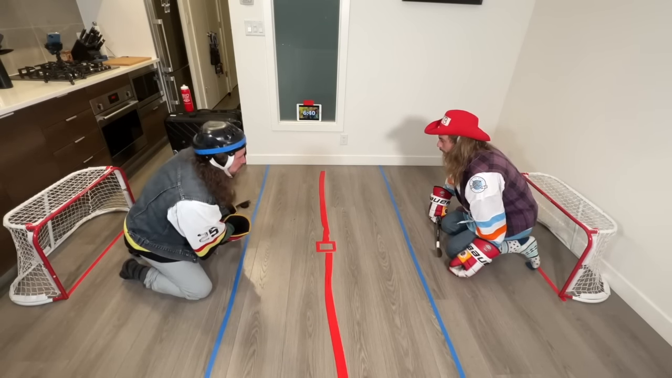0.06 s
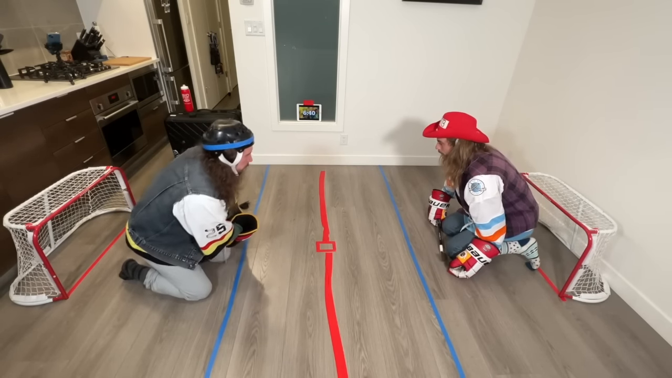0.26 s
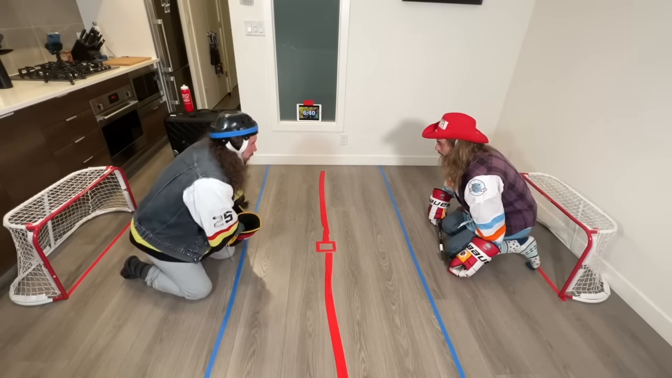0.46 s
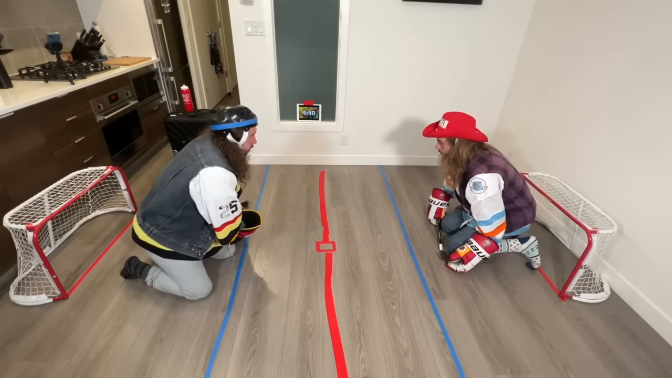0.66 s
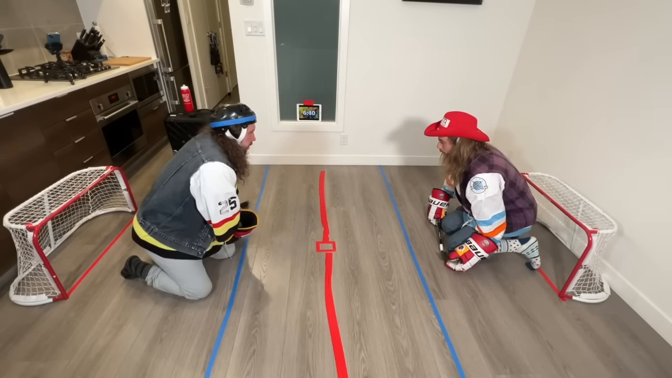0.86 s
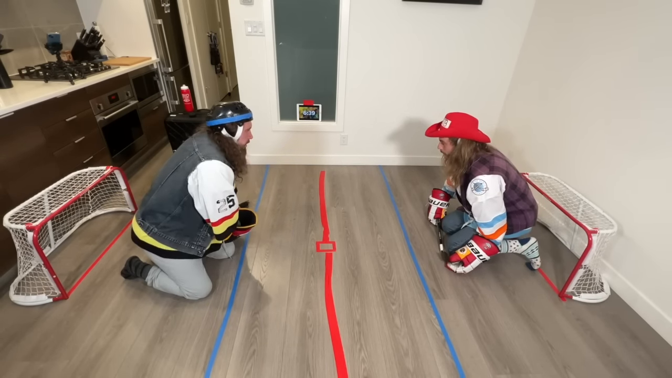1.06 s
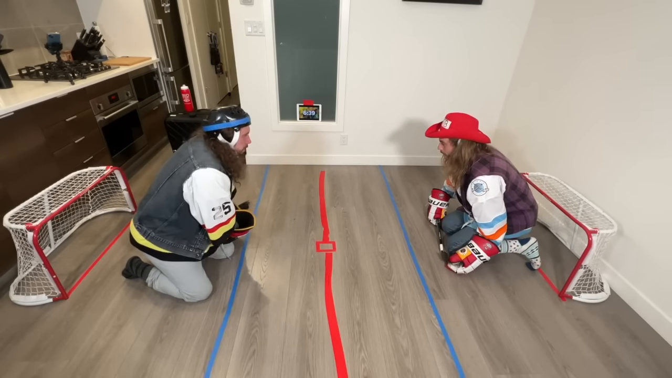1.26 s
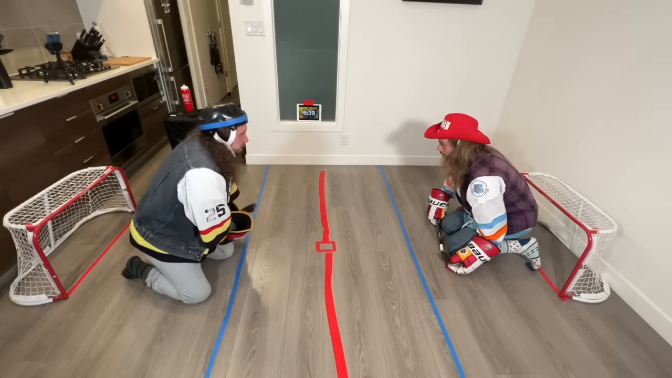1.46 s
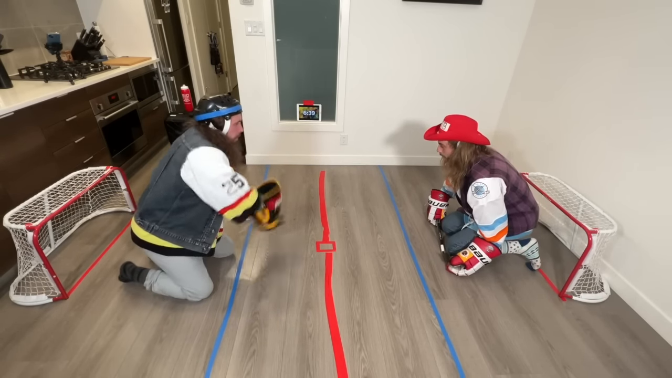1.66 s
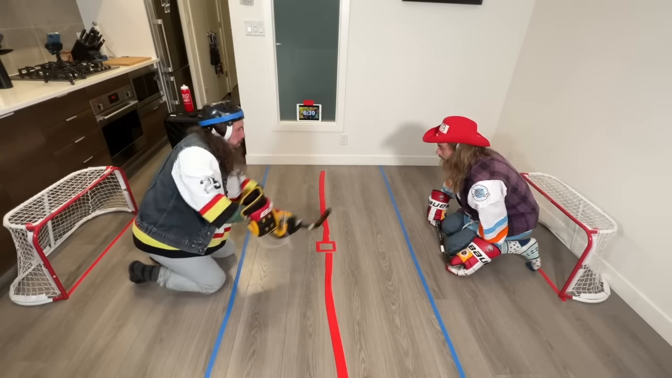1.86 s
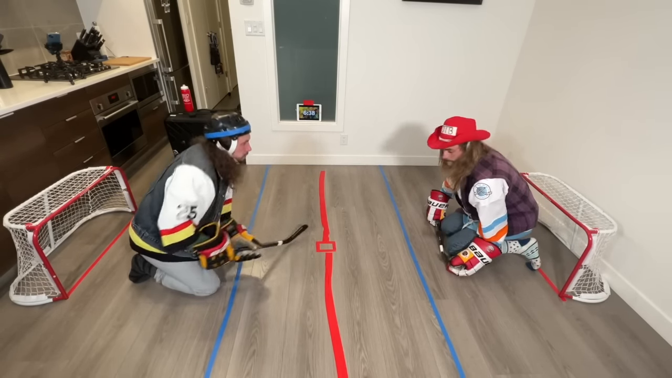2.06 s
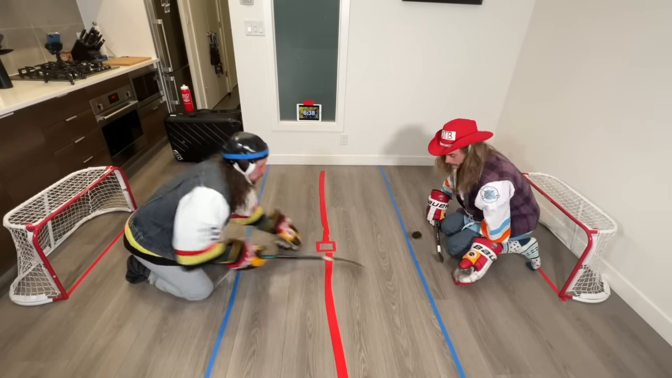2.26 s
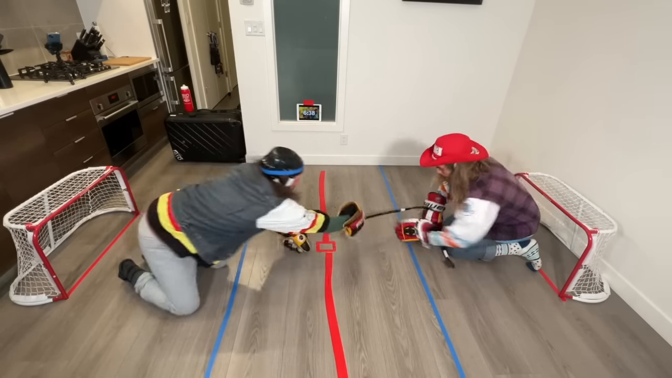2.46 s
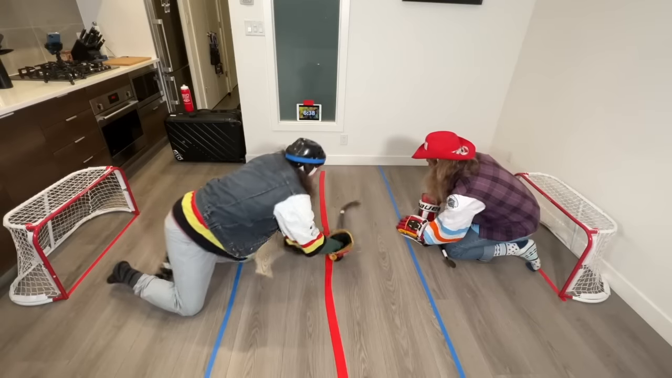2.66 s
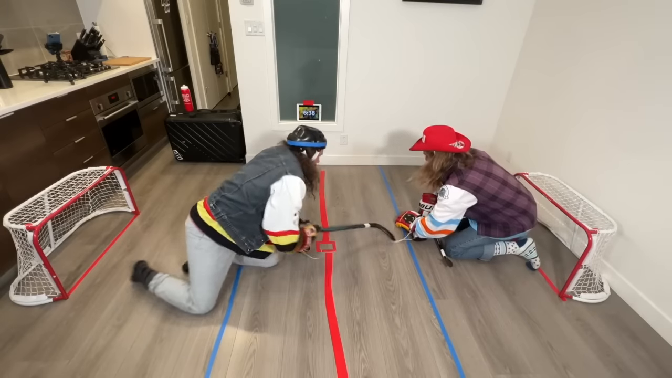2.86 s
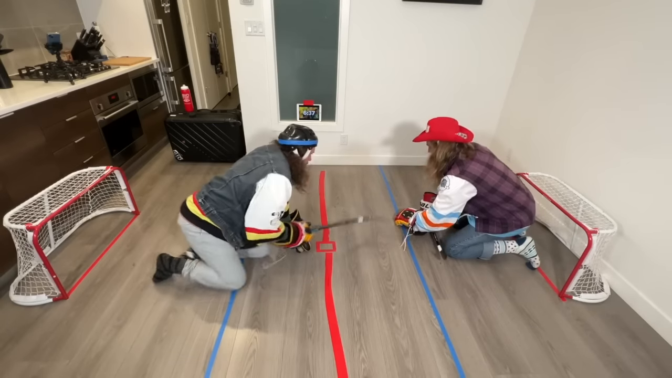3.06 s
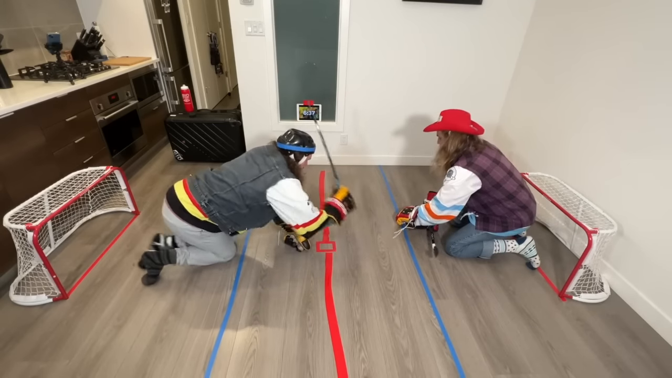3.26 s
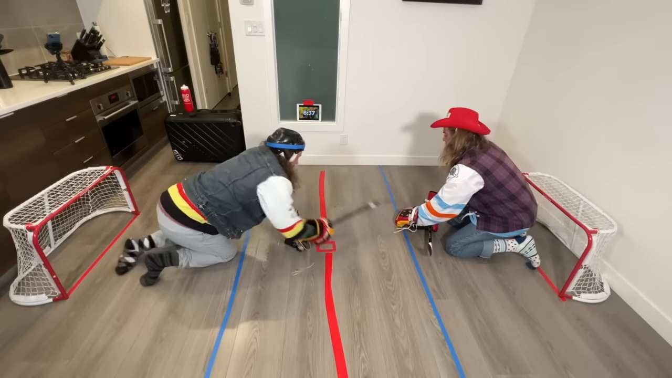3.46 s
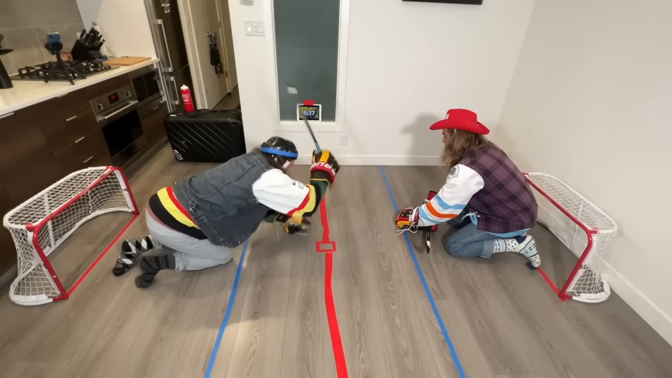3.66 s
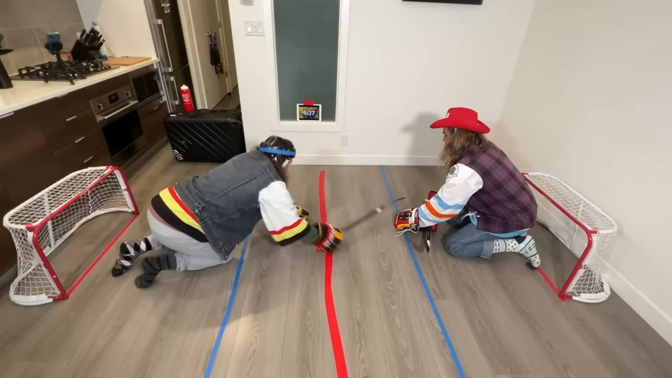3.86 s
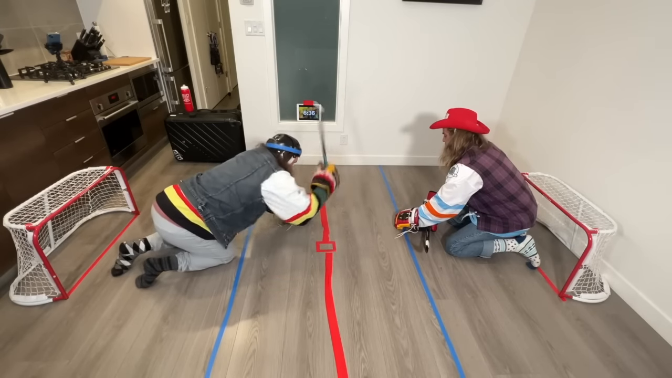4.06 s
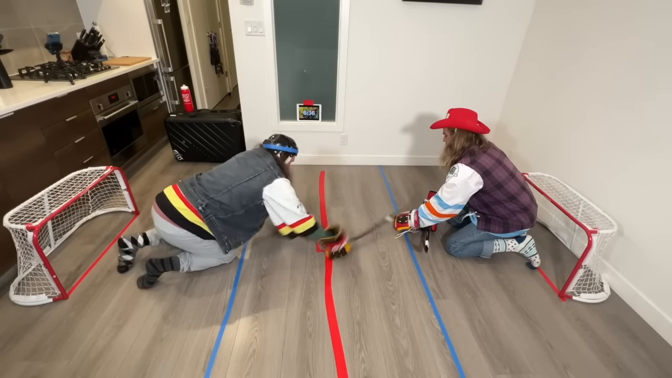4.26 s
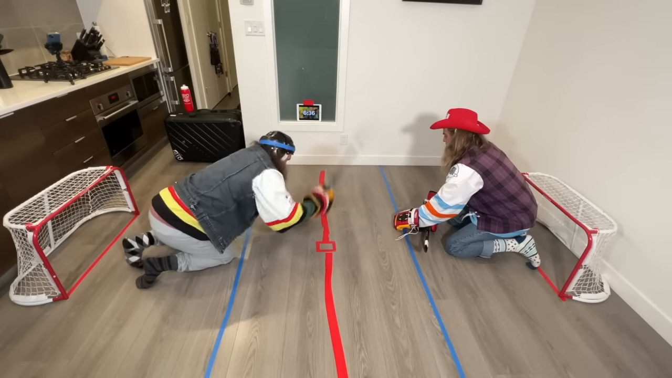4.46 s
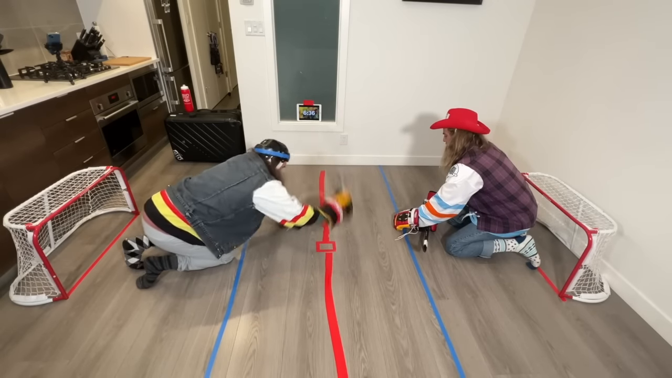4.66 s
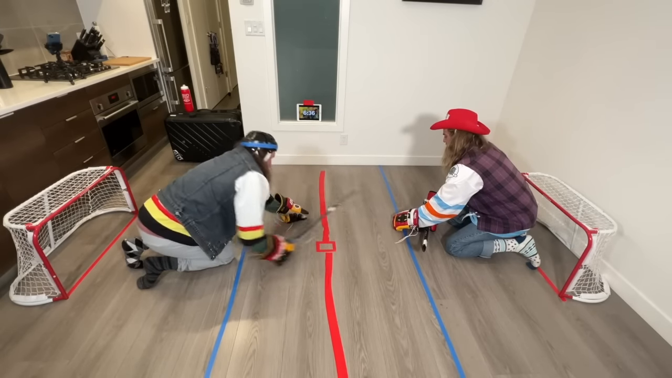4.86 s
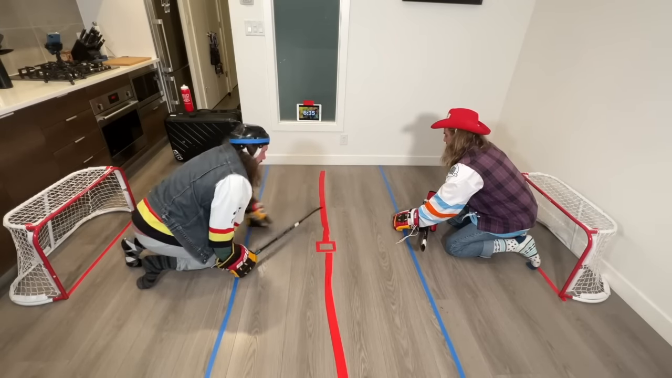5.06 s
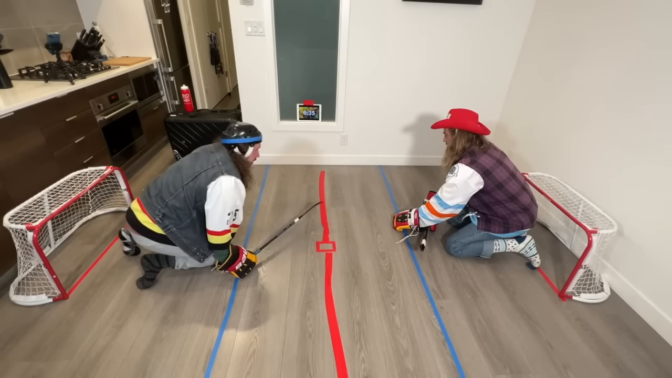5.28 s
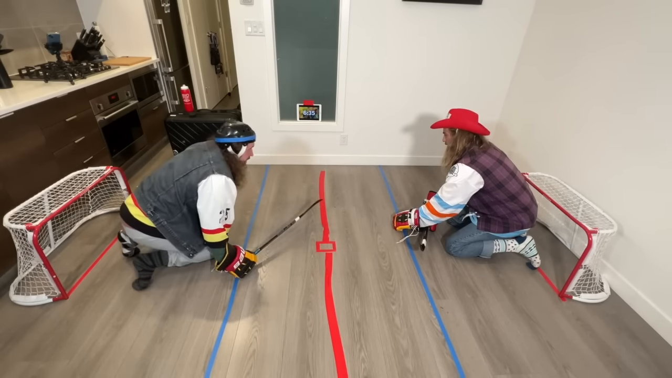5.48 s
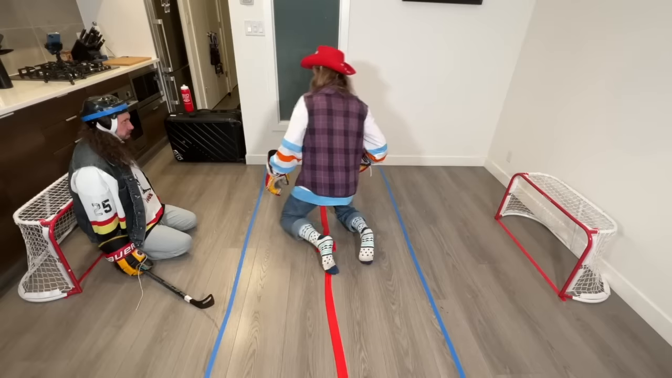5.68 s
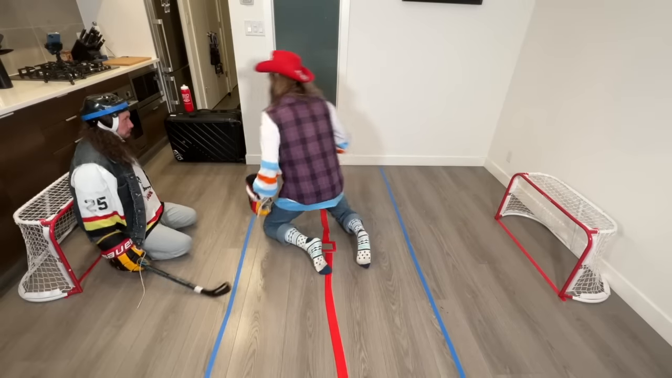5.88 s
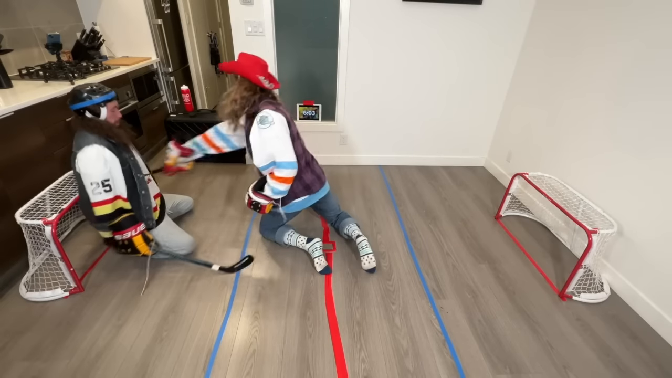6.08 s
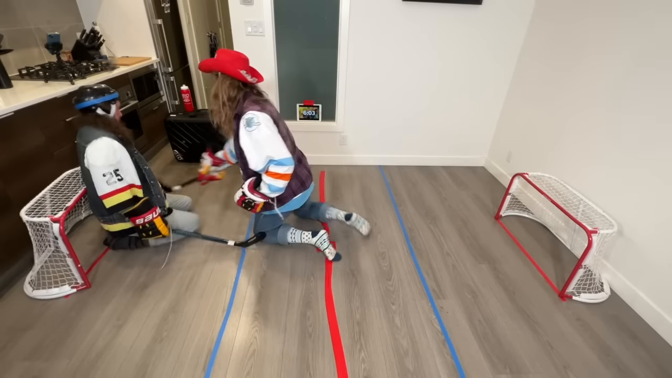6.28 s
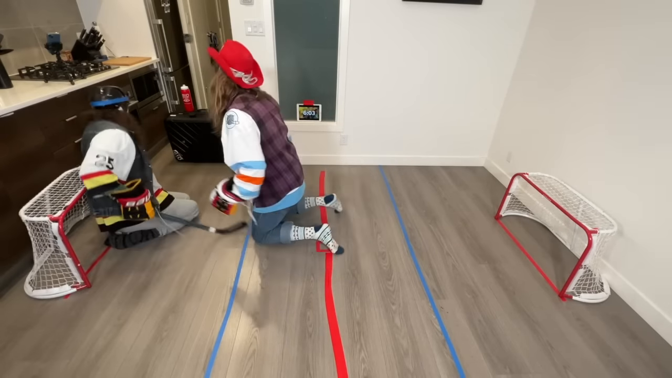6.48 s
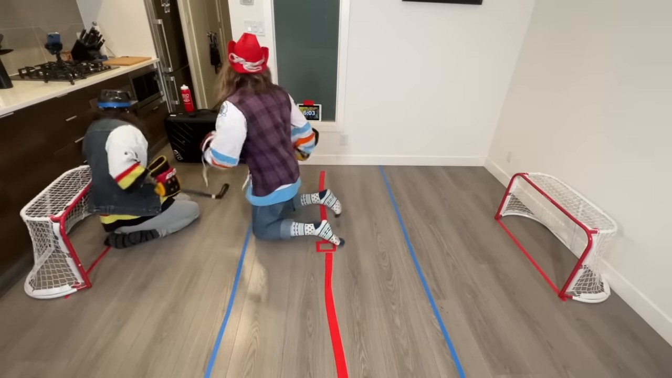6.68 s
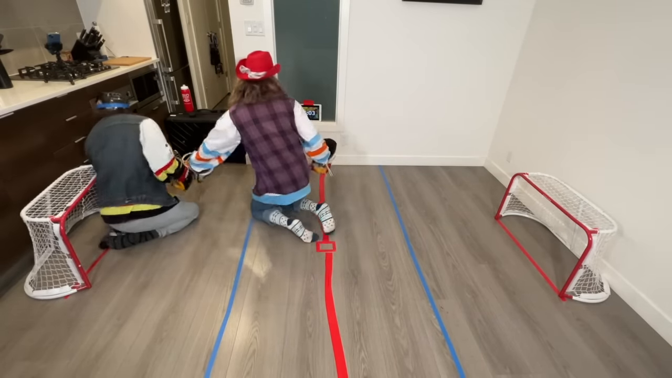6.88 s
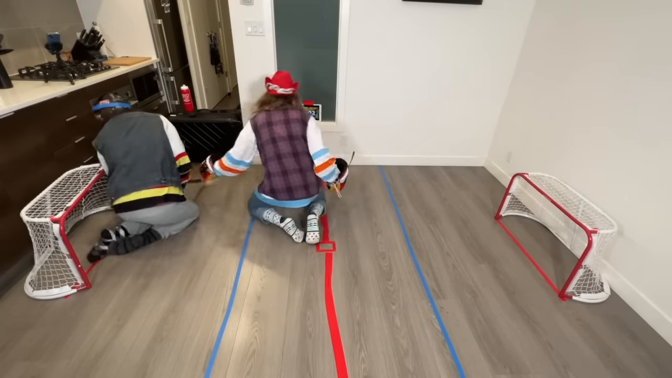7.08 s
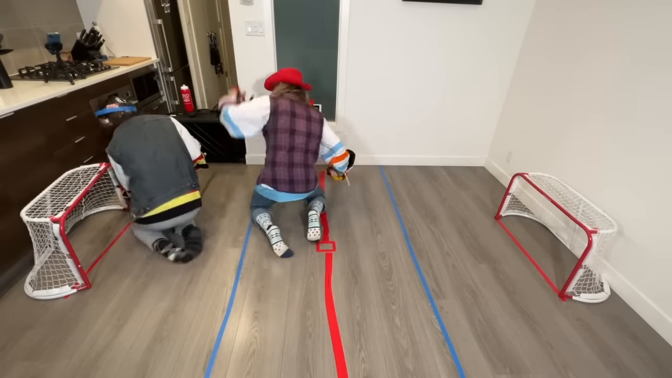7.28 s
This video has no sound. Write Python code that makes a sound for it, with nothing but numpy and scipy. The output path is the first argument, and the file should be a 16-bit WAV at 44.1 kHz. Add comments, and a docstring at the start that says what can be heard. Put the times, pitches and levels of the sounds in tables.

```python
"""Knocks and slides on a kitchen floor

Two kneeling players knock short plastic sticks and a ball on a hard floor; one slaps the boards in a steady beat.
Blows are noise cracks, coloured by resonances, with early reflections and a reverberant tail of the bare room.
Sliding cloth, blades and knees are fluctuating noise; a juddering creak, a thin squeak and droning boards
are narrow bands of noise, over a quiet room tone. An overall tone colour, unequal left and right, and a limiter follow.
"""
import sys
import numpy as np
from scipy import signal
from scipy.fft import rfft, irfft, next_fast_len
from scipy.io import wavfile
from scipy.ndimage import uniform_filter1d, minimum_filter1d, map_coordinates

SR = 44100
rng = np.random.default_rng(int(sys.argv[2]) if len(sys.argv) > 2 else 0)


def undo_db(level):
    """Turn decibels back into plain size, where 20 dB means ten times bigger."""
    steps = np.asarray(level, float) / 20
    return 10 ** steps


def put_to_file(sound):
    """Save the sound as 16-bit audio at rate SR, in the file named by the first command-line argument."""
    columns = np.atleast_2d(sound).T  # one column per channel
    safe = np.clip(columns, -1, 1)
    whole_steps = np.round(safe * 32767)
    wavfile.write(sys.argv[1], SR, whole_steps.astype(np.int16))


N = 323253  # length in samples

# standing waves of the room: (frequency [Hz], width [Hz], peak gain [dB])
ROOM_MODES = [(62, 15, 15), (130, 27, 9), (169.7, 48, 5), (278.4, 16, 4), (560, 31, 0), (702, 40, 0.5)]


def knocks():
    """Impact on hollow bodies: one firm push more than a crackle, then decaying tones of the body and the floor."""
    # shaft, knee and glove; levels before the trims below, the last two against the knock:
    # (time [s], knock level [dB], pitch [Hz], floor thud level [dB], clack level [dB])
    knock_rows = [(0.23, -24.5, 570.8, -51, -14.5), (1.756, -14, 451.5, -15.5, -8),
                  (1.959, -5.5, 473, -30.5, -8.5), (1.971, -10.5, 464, -29, -8.5),
                  (2.155, -30, 319, -11, -2.66), (2.286, -15.5, 459, -52, -18), (2.433, -19, 559, -18, -12),
                  (2.474, -4, 476, -32, -9), (2.489, 1.5, 562, -30, -28), (2.5135, -4.5, 532, -40.5, -6),
                  (2.544, -15, 547, -33.5, -9), (2.602, -11, 520, -30, -8), (2.761, -21.5, 620, -19, 7),
                  (3.271, -44, 636, -21, -9), (5.01, -10.5, 525, -33, -1.5), (5.957, -14.5, 557, -13, -0.3),
                  (6.153, -37, 524, -8.5, 9.5), (6.262, -24.5, 646, 7, 0.1), (6.364, -13.5, 527, -15, -11),
                  (6.611, -11, 420, -28, -3.5), (6.649, -21, 393.5, -42, -29.5),
                  (6.805, -23.5, 437, -3, -13), (6.879, -25, 455, 0.26, -13), (7.039, -5, 386, -27, -11)]
    total = np.zeros((2, N))
    for s, db, hz, thud, clack in knock_rows:
        middle = -1.5 + 0.143 * thud  # heavier knocks carry more middle
        parts_db = db - 15 + np.array([thud - 1.5, 0, middle, clack + 3, clack - 22])
        total += blow(s, parts_db, [(hz, 90, 9)], rise=0.00085, push_db=23)
        total += hollow(s, db - 10.5, hz, t60=0.1174)
        total += hollow(s + 0.004, db + thud - 11, hz=128, t60=0.12)  # the floor
    return total


def clacks():
    """Impact of hard plastic on plastic and on the ball: a broadband crack coloured by the modes of the shaft."""
    # levels before the trims below, the last two against the clack:
    # (time [s], clack level [dB], body level [dB], snap level [dB])
    clack_rows = [(2.1899, -31, -7, -23), (2.306, -5, -13, -14), (2.5815, -3, -10.5, -22.5),
                  (2.6896, -19, -13, -16.5), (2.849, -27.5, -8, -14.5), (5.0114, -9.5, -3.5, -29),
                  (5.5793, -52, -10, -36), (6.132, -31, 8.5, -22), (7.0375, -5.5, -4.5, -25.5),
                  (7.229, -23, -7, -24)]
    # the struck shaft rings: (frequency [Hz], width [Hz], peak gain [dB])
    shaft_modes = [(1300, 110, 3.5), (2606, 81, 2.5), (3426, 480, 5.5), (4590, 550, 2), (4920, 200, 4),
                   (6900, 760, 3)]
    start_s, gap_s, body_db, snap_db = 1.6428, 0.0087, -27, -19.5  # a stick pulled free chatters
    rattle = [(start_s + k * gap_s, db, body_db, snap_db) for k, db in enumerate([-11.5, -4, -5, -4.5, -8.5])]
    total = np.zeros((2, N))
    for s, db, body, snap in rattle + clack_rows:
        middle = -2 + 0.64 * body  # the middle follows the body in part
        parts_db = db - 9 + np.array([body - 26.5, body + 3, middle, 0, snap + 2])
        total += blow(s, parts_db, shaft_modes, rise=0.0025, push_db=20.5)
    return total


def slaps():
    """Flat impact of a blade, often heel first: a crack coloured by the blade's modes, and two decaying tones."""
    # levels before the trims below: (time [s], clack level [dB], body level against the clack [dB])
    slap_rows = [(3.3646, -11, -2.5), (3.8233, -19.5, 2), (3.8306, -12, -7), (3.8479, -14.5, -7),
                 (4.2638, -11.5, -6.5), (4.2768, -12, -5.5), (4.7244, -10.5, 1.5), (4.7312, -14, -0.2)]
    # the slapped blade rings: (frequency [Hz], width [Hz], peak gain [dB])
    blade_modes = [(345, 77, 7.5), (1320, 120, -1), (1575, 320, 3), (6170, 1300, 3)]
    total = np.zeros((2, N))
    for s, db, body in slap_rows:
        parts_db = db - 6.5 + np.array([-8, body + 3, -0.03, 0, -11.5])
        total += blow(s, parts_db, blade_modes, rise=0.00086, push_db=19.5)
        total += hollow(s, db + body - 4.5, hz=493.9, t60=0.082)
        total += hollow(s, db - 21.5, hz=1556, t60=0.3)
    return total


def blow(s, parts_db, modes, rise, push_db):
    """Room impulse response: a crack comes direct, then as early reflections, then as decaying reverberation."""
    # thud, knock, slap, clack, snap: (frequency [Hz], width over which the power is spread [Hz])
    part_bands = [(130, 150), (460, 550), (1400, 1100), (4300, 5800), (12000, 6500)]
    # gain of the straight path, ahead of the blow's colour: (frequency [Hz], gain [dB])
    direct_gain = [(100, -22), (400, -3), (2000, 0), (7000, 4), (12000, 13)]
    t = np.arange(int(0.9 * SR)) / SR
    onset = 1 - np.exp(-t[:800] / rise)
    crack = undo_db(8.0 - 60 * t[:800] / 0.0074) * onset * rng.standard_normal(800)
    crack[20:28] += undo_db(push_db) / 8  # the contact itself, a fifth of a millisecond

    walls = np.zeros((2, 2000))  # nine reflections on each side
    delay = rng.integers(120, 2000, (2, 9))
    for side in range(2):
        walls[side, delay[side]] = undo_db(-6.5 - 60 * delay[side] / SR / 0.45) * rng.choice([-1, 1], 9)
    reflections = signal.fftconvolve(crack[None], walls, axes=1)

    answer = diffuse(len(t)) * (1 - np.exp(-t / 0.0008))
    answer[:, :2799] += filtered(reflections, lambda hz: hz / (hz + 300))
    answer = dying(answer) * (t > 0.002)
    direct = filtered(np.pad(crack, (0, 1200)), lambda hz: causal(along(direct_gain, hz)))
    answer[:, :2000] += direct

    part_hz, part_width = np.transpose(part_bands)
    density = np.transpose([part_hz, parts_db - 10 * np.log10(part_width / (SR / 2))])

    def colour(hz):
        deep_bass_cut = 14 * np.log2(1 + 50 / (hz + 1))
        return causal(along(density, hz) + peaks_db(ROOM_MODES + modes, hz) - deep_bass_cut)

    return np.pad(filtered(answer, colour), ((0, 0), (round(s * SR), N)))[:, :N]


def hollow(s, db, hz, t60):
    """Damped free vibration: a struck body's sine decays exponentially, out of step on the two sides."""
    t = np.arange(SR // 4) / SR
    envelope = undo_db(db - 60 * t / t60) * (1 - np.exp(-t / 0.0011))
    ring = envelope * np.sin(2 * np.pi * hz * t + rng.uniform(-1.1, 1, (2, 1)))
    return np.pad(ring, ((0, 0), (round(s * SR), N)))[:, :N]


def strokes():
    """Sliding friction: cloth and blades hiss over the boards as noise that catches and lets go unevenly."""
    # peak level before the flutter, signs of the times ignored:
    # (peak time [s], level [dB], time to gain 20 dB [s], time to lose 20 dB [s])
    stroke_rows = [(0.2, -50.5, 6, 0.42), (1.236, -67, -0.6, 2.95), (1.55, -38, 0.1883, 0.73),
                   (1.655, -27, 0.03, 0.22), (2.206, -56, -0.3, 3), (2.33, -22, 0.0428, 0.22),
                   (2.524, -29, 0.0454, 0.04), (2.648, -25, 0.19, 0.28), (3.2, -48.5, 0.4, 0.93),
                   (5.6, -62, .1, 0.2), (5.83, -46, -0.05, 3), (5.96, -35.5, 0.13, .3),
                   (6.188, -27, 0.11, 0.16), (6.53, -29, 0.1742, 0.1), (6.63, -42.5, -0.06, -0.5),
                   (6.808, -42, -0.2, 10)]
    # relative density: (frequency [Hz], level per Hz [dB])
    hiss_density = [(410, -40.5), (700, -6.5), (1940, -3), (4990, -4.5), (9230, -18.5), (10100, -26.5),
                    (12500, -27.5), (13700, -35.5), (14600, -22), (16000, -42)]
    fidget = undo_db(-78.5)  # the players are never quite still
    flutter = undo_db(1.2 * wobble(60) + 0.88 * wobble(400))
    return (swells(stroke_rows) + fidget) * flutter * rush(hiss_density, patchy_db=2.5)


def scuffs():
    """Friction exciting resonances: pushed knees rub lower than cloth and wake the standing waves."""
    # peak level before the flutter, signs of the times ignored:
    # (peak time [s], level [dB], time to gain 20 dB [s], time to lose 20 dB [s])
    scuff_rows = [(0.0, -48.5, .1, 0.35), (0.248, -41.5, 0.098, 0.21), (1.414, -55, 0.17, 0.17),
                  (1.512, -46, .03, 0.259), (1.645, -41, 0.067, 0.027), (2.206, -36.5, 0.076, 0.19),
                  (2.312, -26.5, .015, 0.13), (2.432, -22, 0.0067, .08), (2.5, -19.5, 0.06, 0.11),
                  (2.59, -23, .012, 0.26), (3.2, -60.5, 0.83, .9), (5.66, -63, 0.12, 0.0205),
                  (5.82, -45.5, 0.056, 2.6), (5.962, -30.5, 0.022, 0.32), (6.19, -36, 0.215, 0.45),
                  (6.44, -29.5, 0.096, 0.2), (6.63, -27, .035, 0.11), (6.808, -34.5, .025, 0.332)]
    # relative density before the standing waves: (frequency [Hz], level per Hz [dB])
    rub_density = [(65, -36.5), (110, -29), (354, -5), (387, -2), (690, -1), (850, -6.5), (1250, -11),
                   (1500, -9.5), (1950, -50), (3300, -120)]
    fidget = undo_db(-68)
    flutter = undo_db(1.8 * wobble(25))
    knees = filtered(rush(rub_density, patchy_db=1), lambda hz: undo_db(peaks_db(ROOM_MODES, hz)))
    return (swells(scuff_rows) + fidget) * flutter * unit(knees)


def creak():
    """Stick-slip judder of a dragged knee: a rough tone whose mostly odd overtones grow as the drag firms up."""
    # (time [s], pitch [Hz], level [dB], level of the overtones against the tone [dB])
    creak_rows = [(1.22, 487.8, -72, -31), (1.3, 475, -57.5, -25), (1.37, 436, -54, -7),
                  (1.44, 425, -54.5, 1), (1.5, 424, -47.5, -4.5), (1.545, 449.3, -41, -5),
                  (1.59, 411, -48.5, -6), (1.63, 407, -62.5, -6)]
    # (multiple of the pitch [ratio], level before the overtones' common level [dB])
    overtone_rows = [(2, -11.5), (3, -3.5), (5, -0.5), (7, -8), (9, -4), (12, -9)]
    hz = curve(creak_rows, index=1, off=440.0)
    overtones = sum(undo_db(db) * narrow(k * hz, width=80) for k, db in overtone_rows)
    tone = narrow(hz, width=70) + undo_db(curve(creak_rows, index=3)) * overtones
    return wet(undo_db(curve(creak_rows, index=2)) * tone, room_db=-3.5)


def squeak():
    """Narrow-band friction noise: a thin squeak of fabric, swelling and fading."""
    # level before the -5.5 dB trim:
    # (peak time [s], level [dB], time to gain 20 dB [s], time to lose 20 dB [s])
    squeak_rows = [(3.14, -46.5, .2, 0.35)]
    band = narrow(3400, width=600)
    return wet(swells(squeak_rows, hold=0.049) * undo_db(-5.5) * band, room_db=-2.5)


def drone():
    """Resonance under load: the boards sound two fuzzy tones as a player shifts weight."""
    # (peak time [s], level of the lower tone [dB])
    shift_rows = [(0.018, -57.5), (0.244, -46)]
    # lower and upper tone: (frequency [Hz])
    drone_hz = [285, 557.5]
    low, upper = (narrow(hz, width=50) for hz in drone_hz)
    rise_s, fall_s, upper_db = 0.085, 0.102, 4  # times for 20 dB; upper tone over the lower
    load = swells([(s, db, rise_s, fall_s) for s, db in shift_rows])
    return wet(load * (low + undo_db(upper_db) * upper), room_db=-4.5)


def room_tone():
    """Diffuse background field: steady noise, strongest in the bass."""
    # relative density: (frequency [Hz], level per Hz [dB])
    still_density = [(15, -62.5), (25, -22), (30, -12.5), (43, -2.5), (97, -5.5), (153, -11.5), (217, -20),
                     (242, -16), (363, -20), (936, -16.5), (2610, -29.5), (5430, -43.5), (16000, -64.5)]
    return undo_db(-61.5) * rush(still_density, patchy_db=0.6)


def rush(spectrum, patchy_db):
    """Shaped random noise: a diffuse field of rms 1 with random gain in patches of time and frequency."""
    z = signal.stft(diffuse(N), nperseg=512)[2]
    field = uniform_filter1d(rng.standard_normal(z.shape[1:]), 6, 0)
    field = uniform_filter1d(field, 8, 1)
    pair = signal.istft(z * undo_db(patchy_db * unit(field)), nperseg=512)[1][:, :N]
    return unit(filtered(pair, lambda hz: undo_db(along(spectrum, hz))))


def narrow(hz, width):
    """Quadrature modulation: a line of rms near 1, noise about width Hz wide around a moving pitch."""
    phase = 2 * np.pi * np.cumsum(hz * np.ones(N)) / SR
    return wobble(width) * np.sin(phase) + wobble(width) * np.cos(phase)


def swells(rows, hold=0):
    """Power summation of independent strokes that rise to a peak, hold and fall, straight in dB."""
    t = np.arange(N) / SR
    power = np.zeros(N)
    for s, db, rise, fall in rows:
        before = np.maximum(s - t, 0) / abs(rise)
        after = np.maximum(t - s - hold, 0) / abs(fall)
        power += undo_db(db - 20 * (before + after)) ** 2
    return np.sqrt(power)


def wet(x, room_db):
    """Superposition of a small sound and its reverberation, by convolution with decaying noise."""
    tail = dying(diffuse(SR // 2))
    tail = tail / np.linalg.norm(tail[0])
    return x + undo_db(room_db) * signal.fftconvolve(x[None], tail, axes=1)[:, :N]


def dying(x):
    """Frequency-dependent absorption: each frequency decays exponentially at the room's own speed."""
    # (frequency [Hz], time to fall by 60 dB [s])
    decay_times = [(60, 0.2), (160, 0.47), (320, 0.5056), (600, 0.46), (1000, 0.573), (1600, 0.65),
                   (2900, 0.5636), (7700, 0.53), (13000, 0.25)]
    hz, t, z = signal.stft(x, SR, nperseg=512)
    fade = undo_db(-60 * t / along(decay_times, hz)[:, None])
    return signal.istft(z * fade, SR, nperseg=512)[1][:, :x.shape[1]]


def diffuse(size):
    """Spatial coherence: stereo noise of rms 1, alike in the bass and unrelated above."""
    # left-right correlation: (frequency [Hz], correlation [0-1])
    coherence = [(60, 0.96), (150, 0.95), (350, .25), (700, 0), (5000, 0), (12000, 0)]

    def split(hz):
        turn = np.arccos(np.clip(along(coherence, hz), -1, 1)) / 2
        return [np.cos(turn), np.sin(turn)]

    mid, side = filtered(rng.standard_normal((2, size)), split)
    return np.array([mid + side, mid - side])


def peaks_db(modes, hz):
    """Lorentzian resonances: the gain of modes standing over a flat response."""
    rise = sum((undo_db(db) ** 2 - 1) * w * w / (w * w + 4 * (hz - c) ** 2) for c, w, db in modes)
    return 10 * np.log10(1 + rise.clip(-0.9))


def causal(db):
    """Minimum phase by folding the cepstrum, so nothing sounds before the blow."""
    c = irfft(db * np.log(10) / 20)
    c[1:len(db) - 1] *= 2
    c[len(db):] = 0
    return np.exp(rfft(c))


def filtered(x, response):
    """Linear filtering: the spectrum of x times a response of frequency."""
    m = 2 * next_fast_len(x.shape[-1] // 2 + 4096)
    return irfft(rfft(x, m) * response(np.fft.rfftfreq(m, 1 / SR)), m)[..., :x.shape[-1]]


def wobble(rate):
    """Band-limited random modulation: a smooth curve through rate random knots a second."""
    return map_coordinates(rng.standard_normal(int(N * rate / SR) + 4), [np.arange(N) * rate / SR])


def curve(rows, index, off=-120):
    """Linear interpolation in time: one column of a table per sample, off outside it."""
    rows = np.array(rows)
    return np.interp(np.arange(N) / SR, rows[:, 0], rows[:, index], off, off)


def along(points, hz):
    """Interpolation on a logarithmic frequency axis: (frequency, value) points read at hz."""
    f, v = np.transpose(points)
    return np.interp(np.log(hz + 1), np.log(f + 1), v)


def unit(x):
    """Normalisation of mean power: x scaled to rms 1."""
    return x / np.sqrt(np.mean(x ** 2) + 1e-20)


def scene():
    """Linear superposition of the blows, the sliding, the tones and the room tone."""
    hits = knocks() + clacks() + slaps()
    sliding = strokes() + scuffs()
    return hits + sliding + creak() + squeak() + drone() + room_tone()


def tone_colour(x):
    """Linear filtering: an overall tone colour, unequal left and right, and the treble dips deeply at a few
    narrow places."""
    # (frequency [Hz], gain [dB])
    shared_gain = [(30, -2), (200, 3), (2000, -2.5), (7000, 0), (9500, 3), (10500, -6.5), (11800, 7),
                   (13000, -5), (14000, -28), (15300, 3), (16200, -28.5), (17000, -56.5)]
    # (frequency [Hz], left minus right [dB])
    left_over_right = [(60, 2.5), (130, 1.5), (290, 1), (640, 3), (1410, 2.5), (3100, 3), (6820, 10.5),
                       (15000, -8)]
    return filtered(x, lambda hz: undo_db(along(shared_gain, hz) + np.outer([0.5, -0.5], along(left_over_right, hz))))


def limiter(x):
    """Gain reduction with look-ahead: loud blows are turned down, both sides alike."""
    need = np.minimum(1, undo_db(-1.2) / (np.abs(x).max(0) + 1e-9))
    held = minimum_filter1d(need, size=501, origin=190)  # 60 samples ahead, 440 after
    return x * uniform_filter1d(held, size=101)


def band_limit(x):
    """A steep low-pass at the top of the band."""
    return signal.sosfilt(signal.butter(12, 16970, fs=SR, output="sos"), x)


def record(dry):
    """Signal chain: the overall tone colour, then a limiter on the loud blows."""
    mix = limiter(tone_colour(dry))
    return band_limit(mix)


dry = scene()
out = record(dry)
put_to_file(out)
```